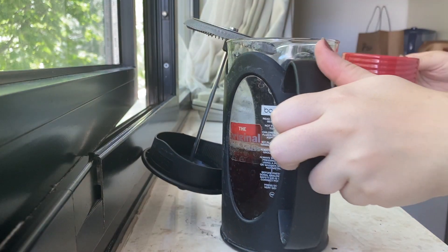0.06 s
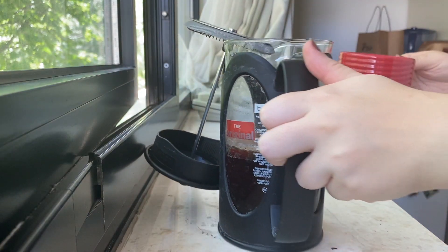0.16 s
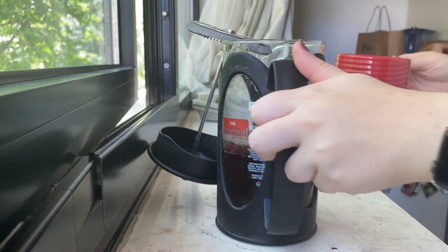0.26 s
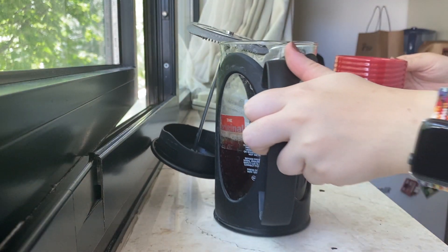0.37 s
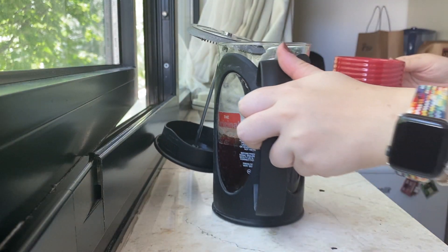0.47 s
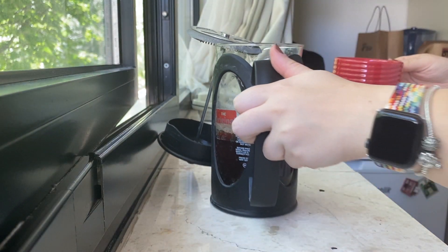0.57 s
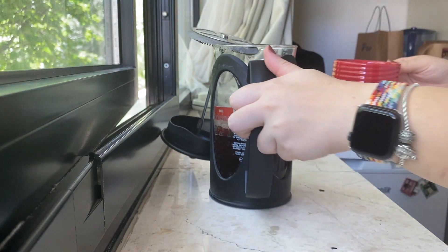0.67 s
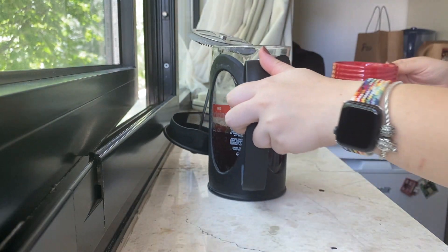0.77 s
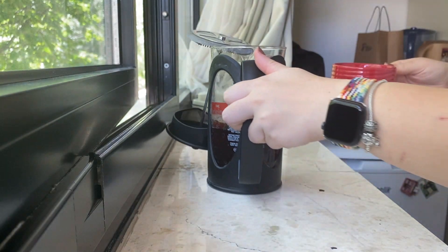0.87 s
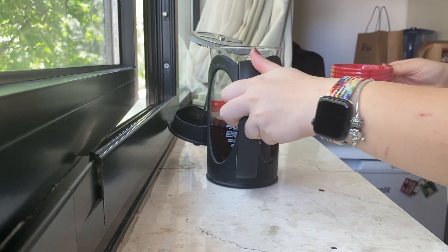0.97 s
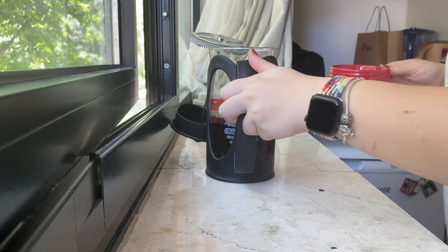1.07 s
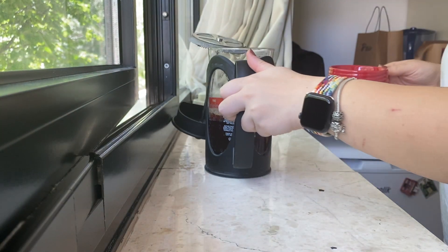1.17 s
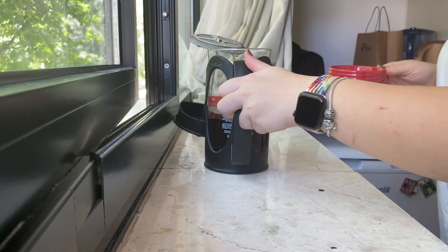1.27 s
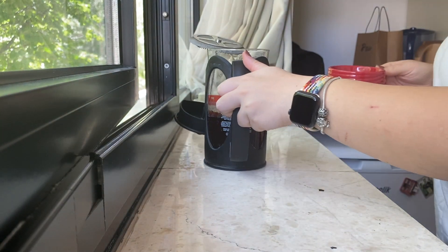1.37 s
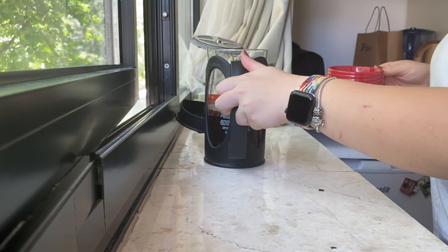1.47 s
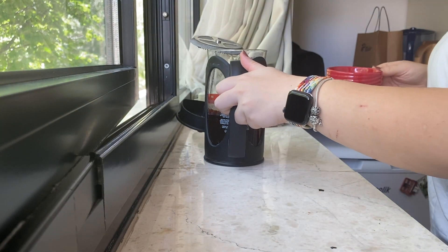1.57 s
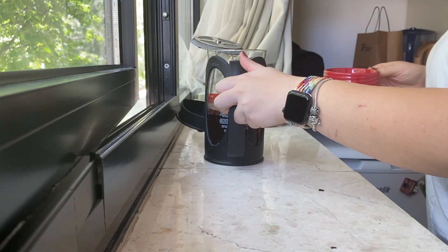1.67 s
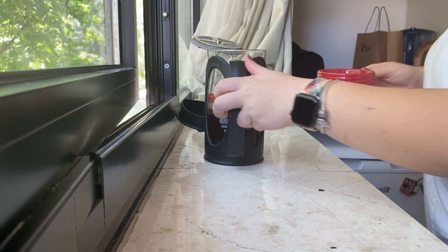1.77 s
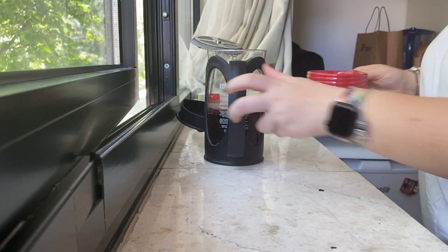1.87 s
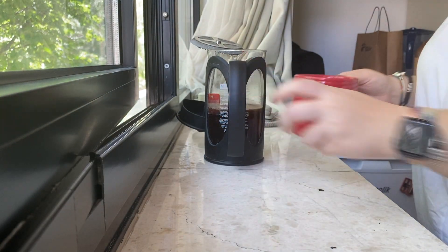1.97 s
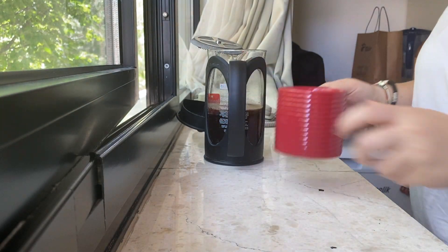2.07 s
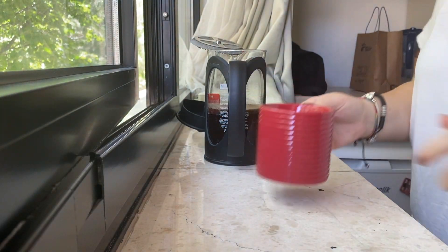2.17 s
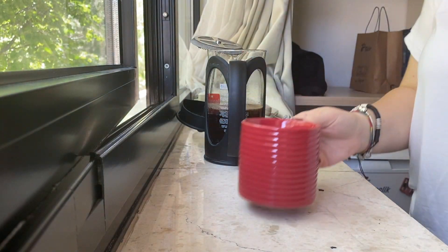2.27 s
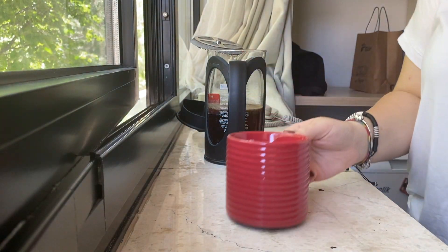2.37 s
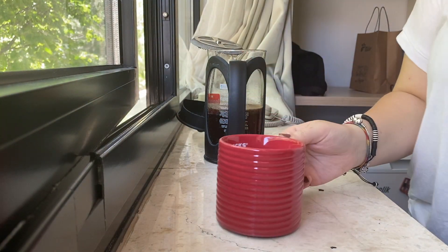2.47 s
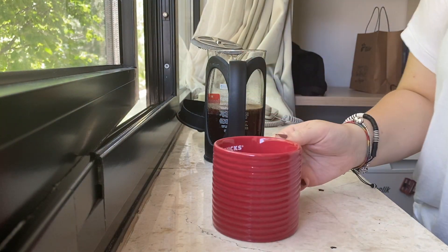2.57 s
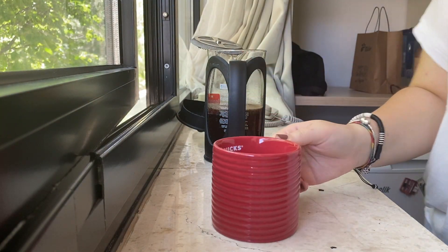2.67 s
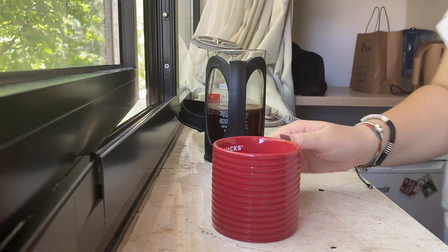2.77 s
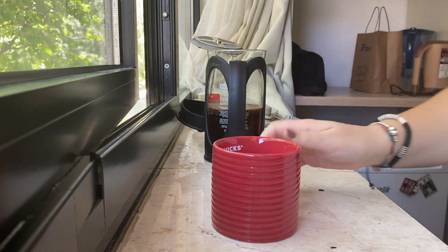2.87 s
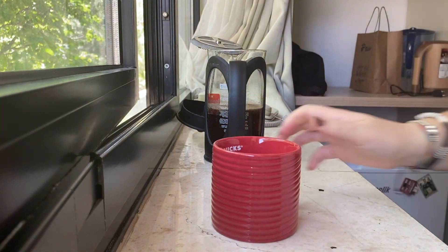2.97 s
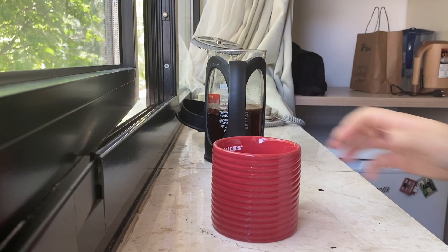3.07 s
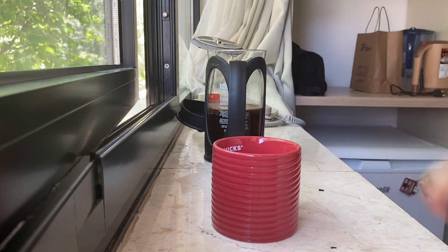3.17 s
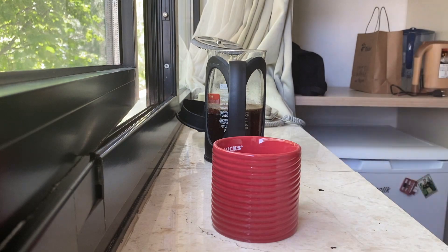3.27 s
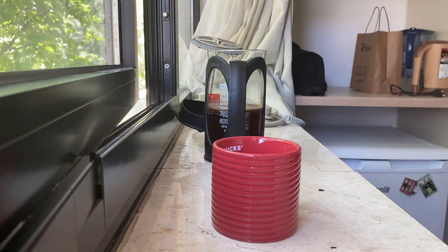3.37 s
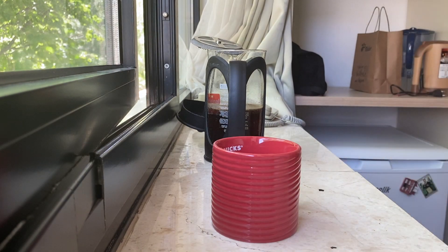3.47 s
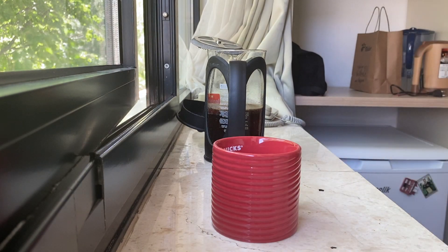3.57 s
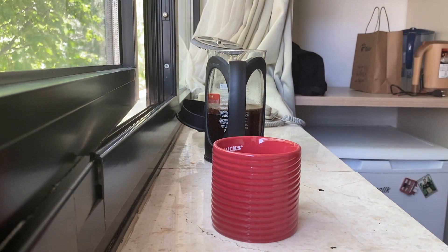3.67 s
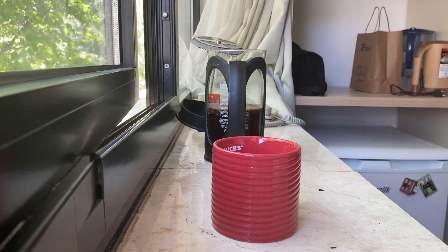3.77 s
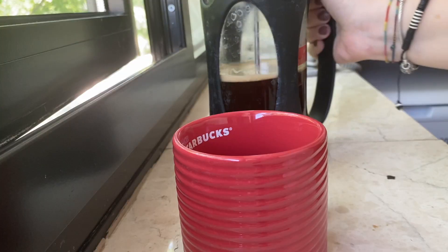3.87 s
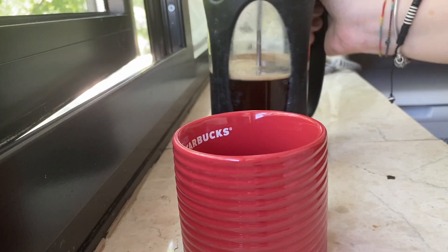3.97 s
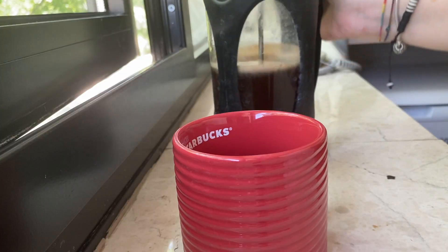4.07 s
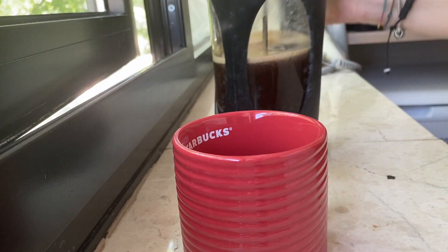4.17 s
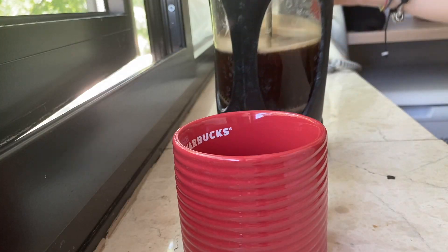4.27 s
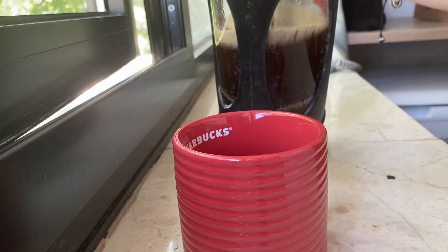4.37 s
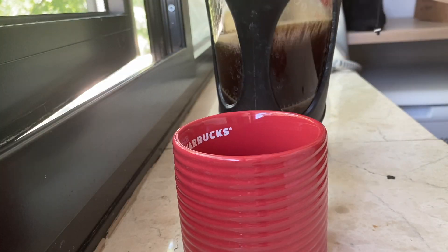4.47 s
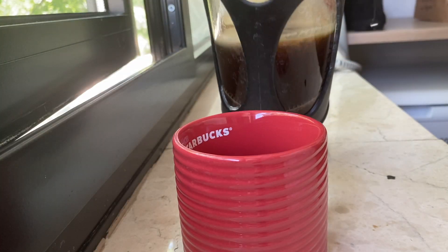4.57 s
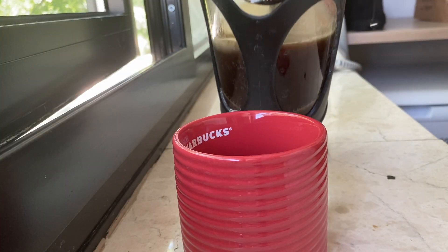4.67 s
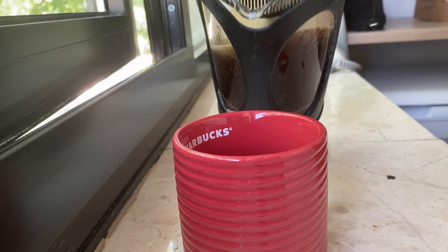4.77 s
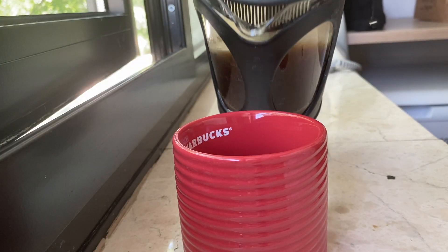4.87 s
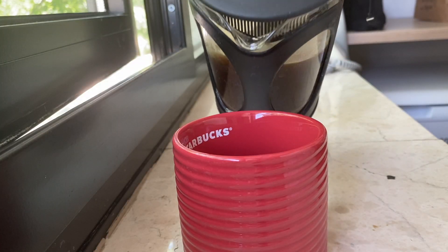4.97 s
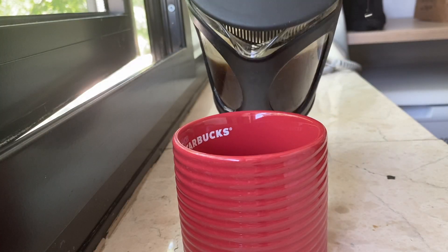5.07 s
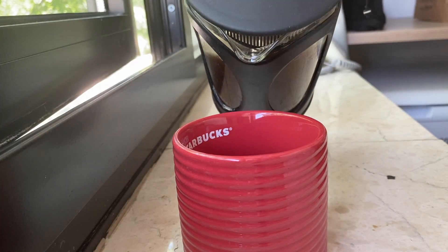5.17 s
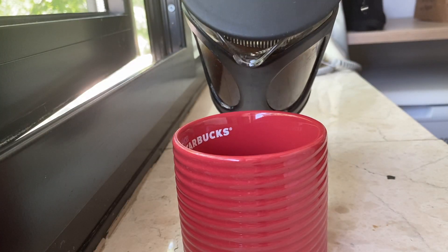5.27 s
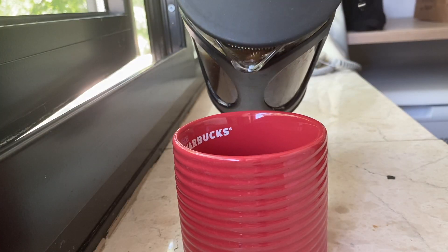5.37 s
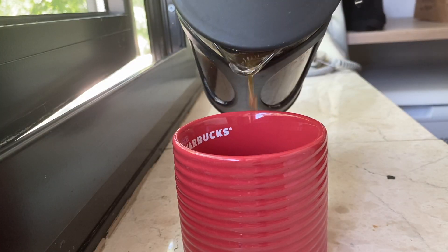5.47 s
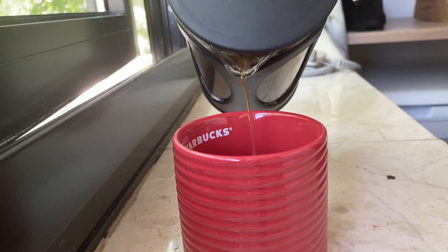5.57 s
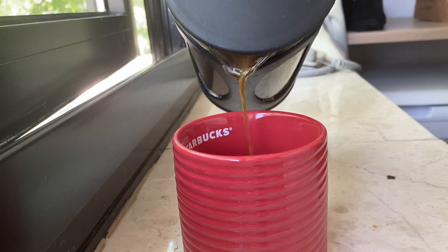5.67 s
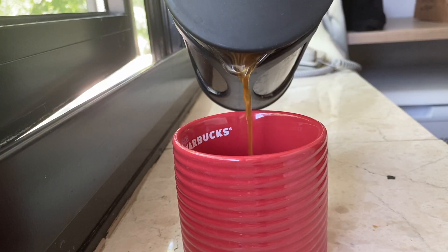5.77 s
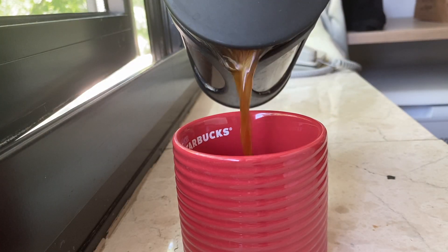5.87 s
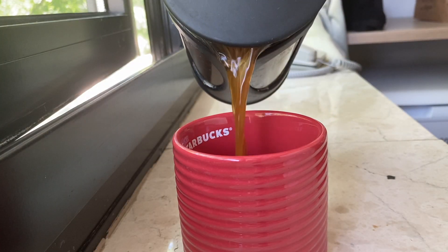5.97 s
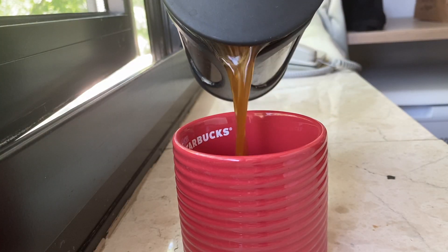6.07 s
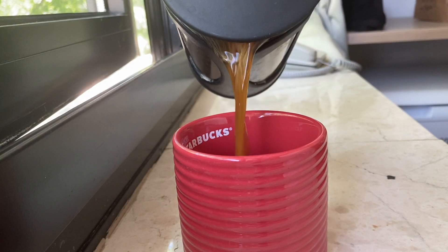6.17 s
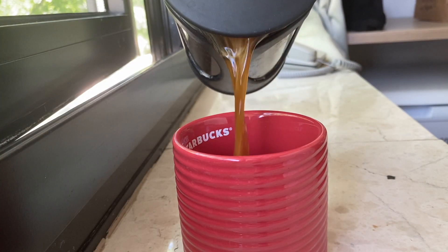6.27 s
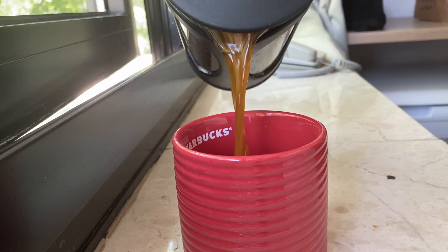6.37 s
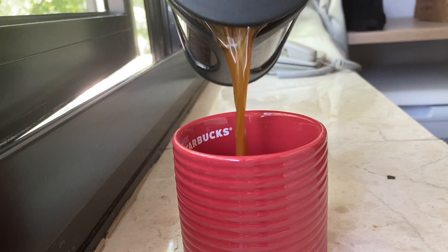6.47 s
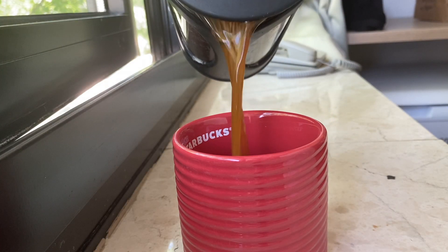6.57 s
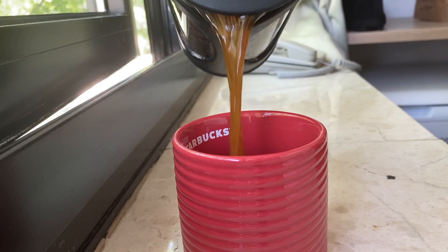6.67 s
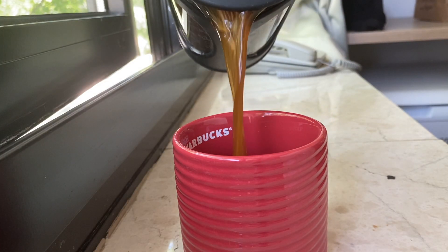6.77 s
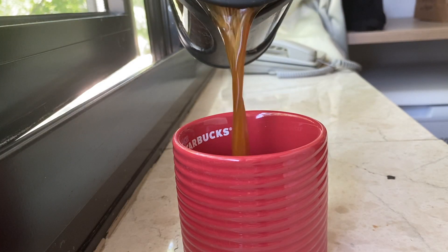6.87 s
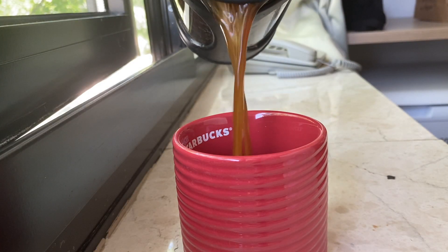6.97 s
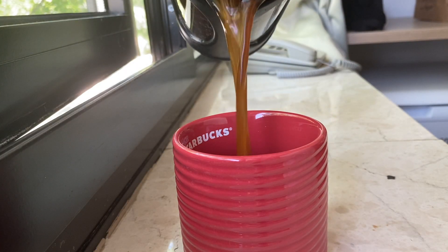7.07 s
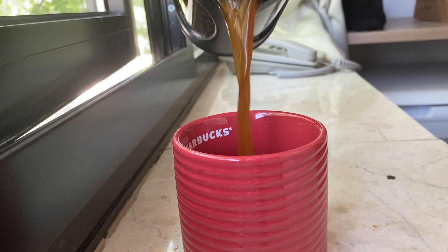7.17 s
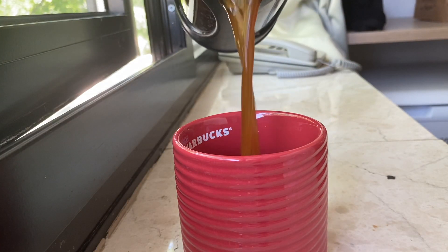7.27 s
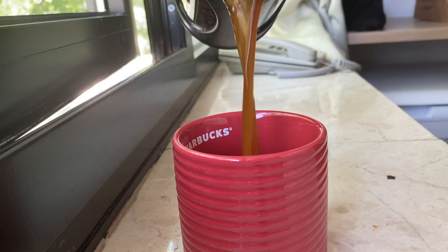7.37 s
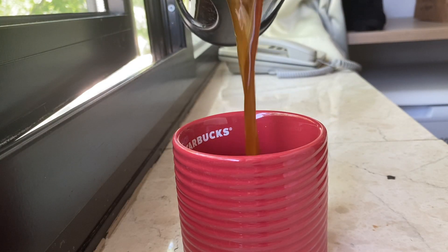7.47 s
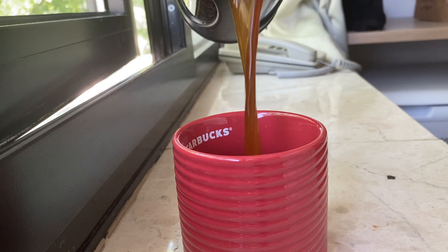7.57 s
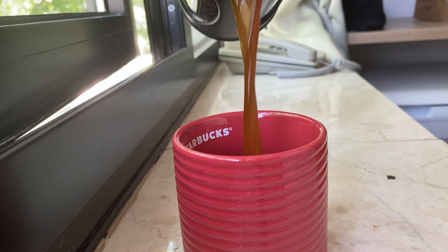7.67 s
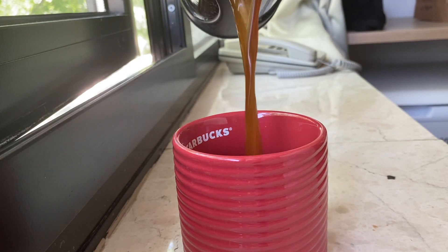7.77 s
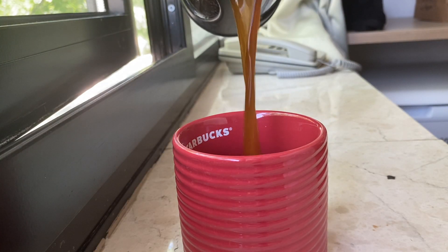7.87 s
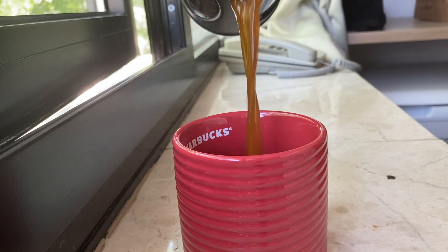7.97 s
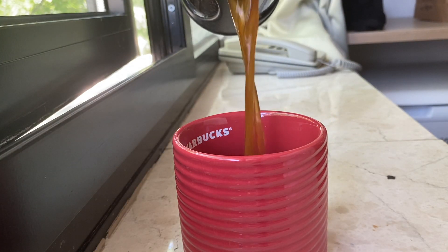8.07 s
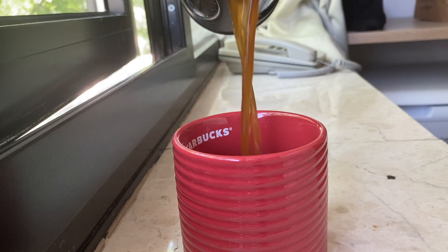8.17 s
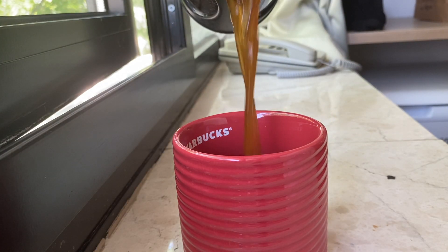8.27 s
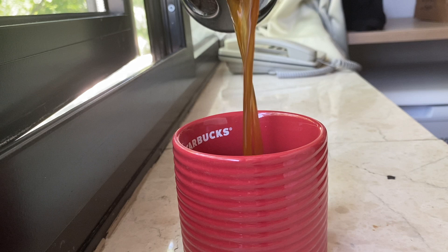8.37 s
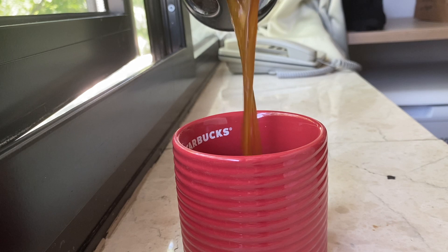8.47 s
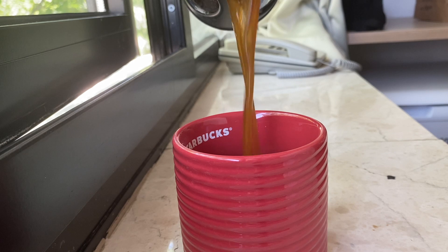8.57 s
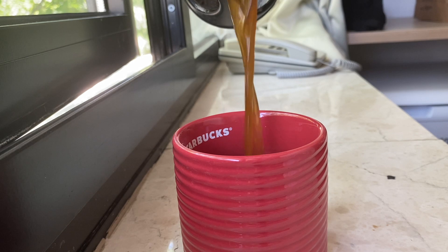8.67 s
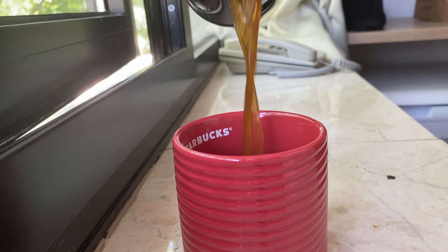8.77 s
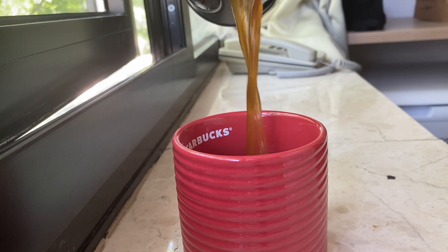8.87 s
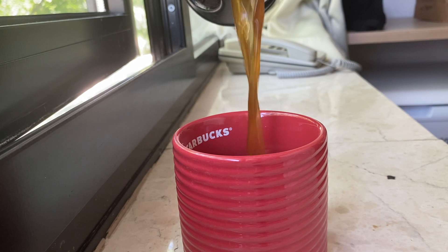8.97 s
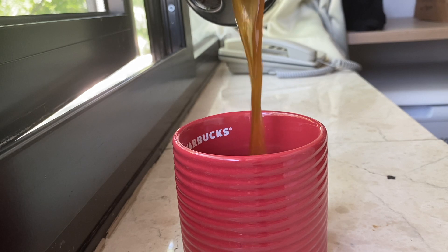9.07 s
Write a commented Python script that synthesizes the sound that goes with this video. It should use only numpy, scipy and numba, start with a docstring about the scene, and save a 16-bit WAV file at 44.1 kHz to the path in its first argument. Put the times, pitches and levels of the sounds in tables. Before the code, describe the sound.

A low room hum runs throughout, and everything is heard close up. From the start, a coffee press slides over a stone sill with a gritty hiss and small catches, juddering in low knocks around 1.1 to 1.3 seconds and stopping with a click near 1.7. At 2.4 seconds an empty ceramic mug lands with a sharp ringing clink, the loudest sound, then chatters hollowly to rest by 2.6. From 3 to 4 seconds come soft hand and cloth rustles, two small snaps, a dull low bump and faint finger squeaks on glass. After a lull, light drips tick near 5.8 seconds. From 6.1 seconds coffee pours into the mug, splashing with bright droplets and bubbly gurgles. From about 7 seconds the bubbles deepen while the mug's hollow ring rises slightly, and the pour continues until the end, just after 9 seconds.

```python
"""Coffee press, mug and pour

In a quiet, humming room a plastic-footed coffee press slides over a stone sill, hissing with friction and
juddering by stick-slip. An empty mug clinks down and rings in its modes; hands rustle and bump. Coffee is
poured: it splashes, bubble resonances deepen as the pool grows, and the shortening air column rings higher.
Two close microphone ports pick up the scene."""
import sys
import numpy as np
from scipy import signal
from scipy.fft import rfft, irfft, next_fast_len
from scipy.io import wavfile
from numba import njit

SR = 44100
rng = np.random.default_rng(int(sys.argv[2]) if len(sys.argv) > 2 else 0)


def master(y):
    """Save y as 16-bit WAV."""
    cut = np.clip(np.atleast_2d(y).T, -1, 1)
    pcm = np.round(cut * 32767)  # scale
    wavfile.write(sys.argv[1], SR, pcm.astype(np.int16))


N = 403074
TIME_S = np.arange(N) / SR


def amp(db):
    """Decibels to gain."""
    return 10 ** (np.asarray(db) / 20)

def rms_one(x):
    """Scale to rms 1."""
    return x / np.sqrt(np.mean(x ** 2) + 1e-20)

def in_time(rows):
    """Columns as curves that hold their end values, then a gate that is 1 within the rows."""
    s, *columns = np.transpose(rows)
    return [np.interp(TIME_S, s, c) for c in columns] + [(TIME_S >= s[0]) & (TIME_S <= s[-1])]

def at_hz(points, hz):
    """Interpolate on a log frequency axis."""
    knots_hz, values = np.transpose(points)
    return np.interp(np.log(hz + 1), np.log(knots_hz + 1), values)

def colour(x, spectrum):
    """Spectral shaping; rms 1."""
    size = next_fast_len(N)
    gain = amp(at_hz(spectrum, np.fft.rfftfreq(size, 1 / SR)))
    return rms_one(irfft(rfft(x, size) * gain, size)[:N])

def butter(x, order, hz, kind):
    """Butterworth filter."""
    return signal.sosfilt(signal.butter(order, hz, kind, fs=SR, output="sos"), x)

def drift(rate_hz):
    """Slow random fluctuation; rms 1."""
    r = np.exp(-80 * np.pi * rate_hz / SR)
    slow = signal.lfilter([1], [1, -2 * r, r * r], rng.standard_normal(N // 40 + 2002))[2000:]
    return np.interp(np.arange(N) / 40, np.arange(len(slow)), rms_one(slow))

def grains(per_s, spread_db):
    """Poisson impulses with a long tail of sizes."""
    hits = rng.random(N) < per_s / SR
    return hits * amp(spread_db * np.minimum(rng.exponential(1, N), 5)) * rng.choice([-1, 1], N)

@njit
def two_pole(x, hz, width_hz):
    """A damped resonator whose centre can move."""
    out, r = np.zeros(len(x)), np.exp(-np.pi * width_hz / SR)
    for i in range(2, len(x)):
        feedback = 2 * r * np.cos(2 * np.pi * hz[i] / SR) * out[i - 1] - r * r * out[i - 2]
        out[i] = x[i] - x[i - 2] + feedback
    return out * (1 - r * r) / 2

def resonate(x, hz, *widths_hz):
    """Resonators in series, one per bandwidth."""
    for width in widths_hz:
        x = two_pole(x, hz * np.ones(N), float(width))
    return x

def add_tone(out, s, db, hz, t60, attack_s, rise=0.0):
    """A damped sinusoid from time s; its pitch climbs by the share rise over t60."""
    i, t = round(s * SR), np.arange(round(3.7 * t60 * SR)) / SR
    envelope = amp(db - 60 * t / t60) * (1 - np.exp(-t / attack_s))
    tone = envelope * np.sin(2 * np.pi * hz * t * (1 + rise * t / t60 / 2))
    out[i:i + len(t)] += tone[:N - i]

def add_crack(out, s, db, t60):
    """Exponentially decaying noise from time s."""
    i, t = round(s * SR), np.arange(round(t60 * SR)) / SR
    out[i:i + len(t)] += rng.standard_normal(len(t)) * amp(db - 60 * t / t60)

def puff(s, db, length_s):
    """Noise that swells and fades around time s."""
    out, size = np.zeros(N), round(length_s * SR)
    i = round(s * SR) - size // 2
    out[i:i + size] = rng.standard_normal(size) * np.hanning(size) * amp(db)
    return out

def swell(peak_s, rise_s, fall_s, db, steepness=1.0):
    """A rounded envelope that reaches db at peak_s."""
    t = TIME_S - peak_s
    away = np.where(t < 0, -t / rise_s, t / fall_s)
    return amp(db - steepness * 19.5 * np.minimum(away, 3) ** 2.2) * (away < 2)

def bursts(per_s, spread_db, decay_s):
    """Shot-noise envelope: random 1 ms onsets, each dying away; rms 1."""
    decay, onset = np.exp(-1 / (decay_s * SR)), np.exp(-1 / (.001 * SR))
    poles = np.convolve([1, -decay], [1, -onset])
    return rms_one(signal.lfilter([1], poles, np.abs(grains(per_s, spread_db))))


# Spectra of the room's rumble and hush: frequency_hz, density_db
RUMBLE_SPECTRUM = [(15, -24.5), (25, -77), (45, 22.5), (125, 26), (165, 10.5), (400, -32)]
HUSH_SPECTRUM = [(200, 5.5), (400, -3.5), (600, -15.5), (1500, -17), (2500, -58), (7000, -40),
                 (12000, -38.5), (13500, -60)]
# Background levels: time_s, rumble_db, hush_db
ROOM_LEVEL = [(0, -40.5, -38.5), (1.6, -42, -43.5), (2.2, -43, -50.5), (2.95, -46, -49),
              (3.1, -44.5, -49.5), (4.0, -43.5, -45), (4.5, -44, -45), (5.0, -44, -42.5), (5.9, -43, -44),
              (9.14, -43.5, -42.5)]

def room_tone(hum_hz=124, hum_width_hz=14, hum_db=-1.5):
    """Ambient noise of the house: broadband murmur and a wavering narrowband hum."""
    rumble_db, hush_db, _ = in_time(ROOM_LEVEL)
    hum = rms_one(resonate(rng.standard_normal(N), hum_hz, hum_width_hz))
    rumble = colour(rng.standard_normal(N), RUMBLE_SPECTRUM) + amp(hum_db) * hum
    return amp(rumble_db) * rumble + amp(hush_db) * colour(rng.standard_normal(N), HUSH_SPECTRUM)


# Sliding speed, expressed as hiss: time_s, level_db
SLIDE = [(0.0, -39), (0.15, -33.5), (0.45, -35), (0.68, -38.5), (1.15, -40.5), (1.32, -38.5), (1.5, -46.5),
         (1.66, -57.5), (1.75, -64)]
# Spectrum of the friction: frequency_hz, density_db
HISS_SPECTRUM = [(1500, -61), (2050, -6), (2420, 5), (2800, 0), (3350, 4.5), (3900, -1), (4600, 0.5),
                 (6600, -2.5), (9000, -4), (16000, -11.5)]

def friction(grit, rub_hz=2407, rub_end_s=1.67):
    """Friction noise: rough stone makes the foot hiss, with a rubbing tone that fades less."""
    hiss_db, sliding = in_time(SLIDE)
    hiss = amp(hiss_db + 1.24 * drift(20)) * colour(grit, HISS_SPECTRUM)
    rub_db = -46.5 + .75 * (hiss_db - SLIDE[0][1]) + 2.1 * drift(15)
    rub = rms_one(resonate(grit, rub_hz * amp(.26 * drift(20)), 190))
    return sliding * (hiss + amp(rub_db) * rub * (TIME_S < rub_end_s))


# The hand leans on the press: start_s, end_s, level_db
PUSHES = [(0.08, 0.586, -42), (0.854, 0.992, -40.5), (1.134, 1.546, -40.5)]
# Body modes of the press, low to high: pitch_hz, width_hz
PRESS_MODES = [(640, 170), (1170, 360), (1700, 650)]

def press_body(grit, edge_db_per_s=266):
    """Forced vibration: grit drives the body modes, most strongly while the hand leans."""
    hiss_db, sliding = in_time(SLIDE)
    out, push = np.zeros((2, N))
    for start, end, db in PUSHES:
        outside_s = np.maximum(0, np.maximum(start - TIME_S, TIME_S - end))
        push += amp(db - edge_db_per_s * outside_s)
    push *= amp(.5 * (hiss_db - np.median(hiss_db[sliding])))
    lowest = np.maximum(amp(hiss_db - 6), amp(.5) * push)   # also sounds between pushes
    for gain, (hz, width) in zip((lowest, push, amp(-7) * push), PRESS_MODES):
        centre_hz = hz * amp(.4 * drift(30))
        waver = amp(.8 * drift(3) + 1.5 * drift(25))
        out += gain * waver * rms_one(resonate(grit, centre_hz, width, 2 * width))
    return sliding * out


# Rough patches under the foot: centre_s, level_db, length_s
CATCHES = [(0.152, -23, 0.016), (0.202, -17.5, 0.047), (0.399, -18.5, 0.013), (0.49, -21.5, 0.023),
           (0.558, -22.5, 0.025), (0.611, -18.5, 0.016), (1.03, -39, 0.012), (1.238, -36, 0.015),
           (1.295, -34, 0.012), (1.316, -25, 0.02), (1.702, -42, 0.01), (1.735, -49, 0.022)]

def catches():
    """Transient friction: each rough patch excites a narrow and a broad resonance."""
    drag = sum(puff(*row) for row in CATCHES)
    return 2.04 * resonate(drag, 2480, 325) + .36 * resonate(drag, 4500, 2700)


# Slips of the foot: start_s, level_db, pitch_hz, t60_s
SLIPS = [(1.068, -20, 223, 0.073), (1.142, -17, 225, 0.052), (1.167, -28.5, 260, 0.11),
         (1.197, -29.5, 186, 0.14), (1.233, -16, 228, 0.055), (1.261, -24, 244, 0.049),
         (1.315, -18.5, 248, 0.067), (1.334, -21, 251, 0.13), (1.72, -41.5, 265.3, 0.22),
         (1.76, -38.5, 261.4, 0.11), (1.929, -44.5, 207, 0.32)]

def judder():
    """Stick-slip: each release of the foot rings the press and the sill."""
    out = np.zeros(N)
    for s, db, hz, t60 in SLIPS:
        add_tone(out, s, db + 13, hz, t60, attack_s=.0085)
        add_tone(out, s, db + 2.5, hz=140, t60=.08, attack_s=.0084)   # the sill thuds
        add_tone(out, s, db + 2, hz=410, t60=.04, attack_s=.0039)   # upper modes die fast
        add_tone(out, s, db - 7, hz=690, t60=.04, attack_s=.003)
    return out


# Dry snaps of bracelet and fingers: start_s, level_db, centre_hz, width_hz
SNAPS = [(1.671, -25.5, 5130, 900), (2.9756, -28, 10500, 8970), (3.401, -29.5, 4000, 1500)]

def snaps():
    """Impulsive excitation of heavily damped resonances."""
    out = np.zeros(N)
    for s, db, hz, width in SNAPS:
        snap = np.zeros(N)
        add_crack(snap, s, db, t60=.015)
        out += resonate(snap, hz, width)
    return out


# Movements of hands and cloth: peak_s, rise_s, fall_s, rustle_db, bright_db
RUSTLES = [(1.95, 0.043, .07, -62, -66), (2.976, 0.0027, 0.078, -50, -45.5),
           (3.154, 0.023, 0.05, -51.5, -64.5), (3.4, 0.44, 0.31, -51.5, -59),
           (3.85, 0.035, 0.066, -59, -55), (3.925, 0.084, 0.016, -66, -47.5),
           (5.415, 0.016, 0.15, -57, -70)]
# Spectra of the rustle and its bright part: frequency_hz, density_db
RUSTLE_SPECTRUM = [(600, -5.5), (1000, 7), (2000, -1), (2700, 2), (3200, -2.5), (3700, -3), (4800, -11),
                   (6000, -53)]
BRIGHT_SPECTRUM = [(3500, -41), (5000, 0.5), (8000, 2.5), (12000, -6), (16000, 4)]

def rustle():
    """Fibre friction: dense tiny clicks merge into swells of noise."""
    fibres = grains(8400, spread_db=1.5)
    cloth = sum(swell(*timing, db) for *timing, db, _ in RUSTLES)
    bright = sum(swell(*timing, db, steepness=1.12) for *timing, _, db in RUSTLES)
    return cloth * colour(fibres, RUSTLE_SPECTRUM) + bright * colour(fibres, BRIGHT_SPECTRUM)


# Mug strikes stone: start_s, air_and_sill_db, wall_db, twin_db, upper_lift_db
CLINKS = [(2.378, 2, -2, -12, -1.5), (2.527, -13.5, -27, -9.5, 12.5), (2.553, -16, -15.5, -16.5, -4)]
# Modes of the mug's wall: pitch_hz, level_db, t60_s
WALL_MODES = [(3017, -1, 0.31), (3044, -16, 0.09), (3900, -34.5, 0.12), (4360, -28.5, 0.1),
              (4730, -39, 0.14), (5105, -36.5, 0.12), (5400, -37.5, 0.09), (6050, -40.5, 0.17),
              (6260, -40.5, 0.078), (6790, -23, 0.23), (6660, -37.5, 0.13), (7590, -43.5, 0.11),
              (11660, -34.5, 0.18), (15300, -40.5, 0.18)]

def clinks(twin_hz=2800, twin_t60_s=.17, roughness=.65):
    """Modal ringing; the handle splits off a low twin mode. Returns the ring and the sill's shaking."""
    ring, cluster, shake, tail = np.zeros((4, N))
    for s, sill_db, wall_db, twin_db, lift_db in CLINKS:
        for hz, db, t60 in WALL_MODES:
            upper_db = (lift_db + 2 * rng.standard_normal()) * (hz > 3300)
            target = cluster if 3300 < hz < 6700 else ring
            add_tone(target, s, wall_db + db + upper_db, hz, t60, attack_s=.0008)
        add_tone(ring, s, twin_db - 4, twin_hz, twin_t60_s, attack_s=.001)
        add_tone(cluster, s, twin_db - 7, .98 * twin_hz, twin_t60_s, attack_s=.001)
        add_crack(shake, s, sill_db - 5.5, t60=.03)
        add_crack(tail, s, sill_db - 21, t60=.2)
    beating = 1 - roughness + roughness * drift(70)   # clustered modes beat unevenly
    return ring + beating * cluster, shake + butter(tail, 4, 3300, "low")


# The base chatters on the sill: start_s, level_db
CHATTER = [(2.391, -8), (2.403, -10), (2.413, -12), (2.424, -26), (2.464, -23), (2.489, -21.5),
           (2.500, -23), (2.521, -11.5), (2.532, -1.5), (2.546, -11.5), (2.562, -10.5), (2.572, -7.5),
           (2.588, -11.5), (2.597, -16.5), (2.791, -43.5)]
# Modes of the air in the empty mug and the sill below: pitch_hz, level_db, t60_s
CAVITY_MODES = [(390.5, -11.5, 0.043), (580, -10, 0.0291), (747.5, -4, 0.018), (864.7, 1, 0.046),
                (902, -15, 0.092), (1352, -18, 0.04), (1918, -13.5, 0.012)]

def hollow_knocks():
    """Cavity resonance: every touch of the base sounds the air in the mug."""
    out = np.zeros(N)
    for s, touch_db, *_ in [*CHATTER, *CLINKS]:
        for hz, db, t60 in CAVITY_MODES:
            add_tone(out, s, touch_db + db + 2 * rng.standard_normal(), hz, t60, attack_s=.0017)
    return out


# Response of the stone: frequency_hz, density_db
SILL_SPECTRUM = [(300, -11), (900, -0.5), (1400, 0), (2000, 6.5), (2500, -1), (4000, -11.5), (5200, -24),
                 (8000, -35)]

def sill(shake):
    """Diffuse response: the stone colours the noise of the impacts."""
    return colour(shake, SILL_SPECTRUM) * np.std(shake)

def grind(start_s=2.524, end_s=2.625):
    """Micro-impacts fade as the mug rocks to rest. Returns the ring and the sill's shaking."""
    ring, shake = np.zeros((2, N))
    for when, softness, pick in rng.random((90, 3)):
        s, hit_db = start_s + when * (end_s - start_s), -10 * softness
        hz, db, t60 = CAVITY_MODES[int(pick * len(CAVITY_MODES))]
        add_tone(ring, s, hit_db + db - 23.5 - 12 * when ** 4, hz, t60, attack_s=.0011)
        hz, _, t60 = WALL_MODES[2 + int(pick * 10)]
        detune = 1 + .04 * (softness - .5)
        add_tone(ring, s, hit_db - 42.5 - 22 * when, hz * detune, t60 / 2, attack_s=.0006)
        add_crack(shake, s, hit_db - 26.5 - 17 * when, t60=.01006)
    return ring, shake


# Booms of the sill: peak_s, rise_s, fall_s, level_db, pitch_hz, width_hz
BOOMS = [(3.325, 0.214, 0.19, -34.5, 195, 73), (3.41, 0.18, 0.082, -23, 123, 10),
         (3.36, 0.18, 0.24, -29, 116, 32), (3.58, 0.4, 0.33, -31, 44, 28.6)]

def booms():
    """Forced vibration: something moved on the sill drives its low resonances."""
    return sum(swell(*envelope) * rms_one(resonate(rng.standard_normal(N), hz, width, 2 * width))
               for *envelope, hz, width in BOOMS)


# Fingers on glass: centre_s, level_db, length_s, pitch_hz, width_hz
SQUEAKS = [(3.698, -62, 0.21, 2500, 500), (3.793, -62, 0.07, 3080, 343), (3.888, -47, 0.035, 3230, 343),
           (3.919, -47, 0.03, 3150, 340), (4.262, -67, 0.065, 3450, 343), (5.434, -66.5, 0.09, 4390, 2500)]

def squeaks():
    """Friction-driven resonance: narrow bands squeak, broad ones scrape."""
    return 7.3 * sum(resonate(puff(*rub), hz, width) for *rub, hz, width in SQUEAKS)


# First drips and lid ticks: start_s, level_db, pitch_hz
TICKS = [(5.5578, -58, 6810), (5.8286, -34.5, 10800), (5.828, -35.5, 15100), (5.9893, -49.5, 10300)]

def ticks():
    """Free decay after light impacts: a click, a faint ring and the answer of the mug's wall."""
    out = np.zeros(N)
    wall_hz, _, wall_t60 = WALL_MODES[9]
    for s, db, hz in TICKS:
        add_tone(out, s, db + 8.5, hz, t60=.006, attack_s=.00026)
        add_tone(out, s, db - 14, hz, t60=.09, attack_s=.001)
        add_tone(out, s, db - 25, wall_hz, wall_t60, attack_s=.001)
    return out


# Strength of the stream about its mean: time_s, level_db
FLOW = [(6.075, -25), (6.13, -4.5), (6.25, 4), (6.4, 2.5), (6.57, -3.5), (6.7, 5.5), (7.0, 2), (7.45, -0.5),
        (7.83, 5), (7.92, -3), (8.018, 3.5), (8.3, 3.5), (8.5, 1), (8.6, -4), (8.72, 1), (8.92, 6.5),
        (9.14, 1)]
POUR_START_S, POUR_END_S = FLOW[0][0], FLOW[-1][0]

def stream_gain(db, flow_share, growth_db_per_s):
    """Amplitude modulation by the stream; zero outside the pour."""
    flow_db, pouring = in_time(FLOW)
    return pouring * amp(db + flow_share * flow_db + growth_db_per_s * (TIME_S - POUR_START_S))

def bubbles(count, low_hz, span, cycles, spread_db, rise):
    """Minnaert resonance: random rising bubbles from low_hz to span times that; rms 1 in the pour."""
    out, length_s = np.zeros(N), POUR_END_S - POUR_START_S
    for when, softness, place in rng.random((count, 3)):
        hz, db = low_hz * span ** place, -spread_db * np.log(softness + .0057)
        add_tone(out, POUR_START_S + when * length_s, db, hz, cycles / hz, attack_s=.5 / hz, rise=rise)
    return out / np.sqrt(np.sum(out ** 2) / length_s / SR)


# Spectrum of the splash: frequency_hz, density_db
SPLASH_SPECTRUM = [(600, -25), (1300, -10.5), (1700, -14.5), (2050, -13), (2500, -12.5), (3000, -9),
                   (3500, -8.5), (4200, -1.5), (5200, -10.5), (6400, -4.5), (8000, -8), (11000, -13.5),
                   (16000, -11)]
# Bands of the spray: edge_hz
SPRAY_EDGES = [500, 1200, 2400, 4000, 5500, 8500, 13000, 18000]

def splash():
    """Liquid impact noise: small bubbles, and spray whose bands burst partly together, partly alone."""
    together, white = bursts(80, spread_db=4, decay_s=.008), rng.standard_normal(N)
    spray = np.zeros(N)
    for band in zip(SPRAY_EDGES, SPRAY_EDGES[1:]):
        alone = bursts(200, spread_db=3.5, decay_s=.005)
        spray += butter(white * (.8 + .45 * together + .7 * alone), 2, band, "band")
    fizz = bubbles(2000, low_hz=1310, span=7.97, cycles=35, spread_db=7, rise=.12)
    mix = .75 * colour(spray, SPLASH_SPECTRUM) + .3 * colour(fizz, SPLASH_SPECTRUM)
    return stream_gain(-41, flow_share=.68, growth_db_per_s=-.6) * mix

def churn(per_s):
    """Noise of the broken surface: random surges over a steady wash."""
    return rng.standard_normal(N) * (.27 + bursts(per_s, spread_db=4.4, decay_s=.0039))


# Resonances as the mug fills: time_s, bubble_hz, air_hz, wall_hz
FILLING = [(6.07, 955, 946, 2870), (7.0, 1003, 1037, 2935), (7.3, 763, 1045, 2970), (7.7, 585, 1067, 3140),
           (8.1, 402, 1150, 3200), (8.5, 308, 1244, 3120), (9.14, 236, 1260, 3200)]
POOL_HZ, AIR_HZ, WALL_HZ, _ = in_time(FILLING)

def mug_air(cross_hz=1570, lull_s=7.65, lull_width_s=.55):
    """Air resonance amid bubbles: the shortening column rises, the cross mode keeps its pitch."""
    column = rms_one(resonate(churn(80), AIR_HZ * amp(.26 * drift(14)), 75))
    burble = bubbles(900, low_hz=707, span=1.82, cycles=17.6, spread_db=6.5, rise=.24)
    cross = rms_one(resonate(churn(60), cross_hz * amp(.16 * drift(12)), 98))
    lull = np.exp(-((TIME_S - lull_s) / lull_width_s) ** 2)
    cross_db = -7.5 + 1.5 * (TIME_S - POUR_START_S) - 8 * lull
    mix = .52 * column + .69 * burble + amp(cross_db) * cross
    return stream_gain(-46, flow_share=1, growth_db_per_s=2.75) * mix

def wet_wall():
    """Forced vibration: the churning surface drives the mug's wall."""
    ring = resonate(churn(120), WALL_HZ * amp(.29 * drift(41)), 190)
    return stream_gain(-46, flow_share=.66, growth_db_per_s=.63) * rms_one(resonate(ring, WALL_HZ, 750))


# Sharp droplets: start_s, level_db, pitch_hz
DROPS = [(6.08, -26.5, 3900), (6.175, -27, 1530), (6.329, -25, 3070), (6.497, -29, 1750),
         (7.023, -20, 4150), (7.367, -20.5, 3165), (7.757, -22.5, 3300), (6.1162, -15, 4270),
         (6.169, -19.5, 2290), (6.249, -19.5, 2900), (6.304, -20, 2810), (6.3748, -13, 2850),
         (6.433, -15, 7130), (6.466, -20, 3880), (6.554, -19.5, 3060), (6.754, -24, 2880),
         (6.798, -19.5, 4500), (7.259, -21, 3020), (7.476, -25, 3200), (7.522, -20, 3290),
         (7.865, -17.5, 3410), (7.96, -26, 3220), (8.173, -18.5, 3400), (8.4476, -9, 6300),
         (6.769, -24, 2950), (6.885, -20.5, 4030), (8.652, -18.5, 3930), (8.784, -12.5, 3170),
         (8.8147, -13.5, 3570), (8.8375, -18, 3200), (9.052, -14.5, 3200)]

def droplets():
    """Drop impact: a bright puff and a short rising ping."""
    pings, patter = np.zeros((2, N))
    for s, db, hz in DROPS:
        add_tone(pings, s, db - 5, hz, t60=79 / hz, attack_s=.00005, rise=.031)
        add_crack(patter, s, db - 10, t60=.028)
    return pings + butter(patter, 2, 1500, "high")


# Large bubbles: start_s, level_db, pitch_hz
GULPS = [(6.142, -19.5, 947), (6.204, -14, 917), (6.226, -20, 896), (6.25, -25, 920), (6.291, -24, 940),
         (6.293, -25, 1370), (6.36, -9.5, 914), (6.375, -22, 1020), (6.403, -14, 940), (6.404, -20, 1710),
         (6.444, -8.5, 923), (6.446, -16.5, 1230), (6.481, -11, 945), (6.511, -42, 970), (6.574, -22, 935),
         (6.668, -21, 980), (6.686, -13.5, 940), (6.72, -17, 1020), (6.746, -8.5, 970), (6.786, -24, 950),
         (6.826, -18.5, 984), (6.852, -14.5, 967), (6.904, -25.5, 970), (6.972, -20, 960),
         (6.989, -12, 965), (6.991, -20.5, 1280), (7.068, -14, 897), (7.076, -14.5, 950),
         (7.125, -15, 1004), (7.15, -7, 890), (7.163, -17, 740), (7.189, -9.5, 780), (7.274, -11.5, 940),
         (7.298, -9, 840), (7.366, -13, 663), (7.395, -18, 990), (7.431, -16, 775), (7.452, -14.5, 800),
         (7.477, -11, 955), (7.522, -24, 1000), (7.521, -17, 603), (7.575, -23, 660), (7.832, -18.5, 464),
         (7.872, -25.5, 354), (7.541, -18.5, 1050), (7.573, -16, 910), (7.631, -12.5, 916),
         (7.667, -12, 676), (7.696, -10, 522), (7.756, -11, 573), (7.817, -19, 460), (7.861, -15.5, 1170),
         (8.069, -20.5, 410), (8.176, -25, 355), (8.2, -19.5, 363), (8.362, -15.5, 330),
         (8.365, -17.5, 1110), (8.38, -15, 1060), (8.415, -16, 379), (8.45, -16, 338), (8.513, -25, 280),
         (8.659, -20.5, 316), (8.701, -26, 342), (8.73, -20.5, 304), (8.758, -23, 300), (8.845, -21, 280),
         (8.897, -21, 277), (8.948, -20, 273), (8.783, -21, 294), (8.785, -20, 1200), (8.819, -22.5, 273),
         (8.819, -10, 1500), (8.878, -20.5, 280), (8.923, -12, 289), (8.923, -19, 1640), (9.016, -23, 284),
         (9.079, -20.5, 276), (9.08, -12.5, 1044)]
DEEP_FROM_S = 7.14

def gulps(companion_hz=1117):
    """Minnaert resonance of large bubbles; in a deep pool they chirp more and ring the air column."""
    out, spatter = np.zeros((2, N))
    for s, db, hz in GULPS:
        if s < DEEP_FROM_S:
            add_tone(out, s, db + 4.5, hz, t60=.028, attack_s=.0021, rise=.031)
        else:
            add_tone(out, s, db + 9, hz, t60=.0037 + 9.8 / hz, attack_s=.0024, rise=.18)
            add_tone(out, s, db - 5, AIR_HZ[round(s * SR)], t60=.033, attack_s=.003)
        add_tone(out, s, db - 5.5, 1.495 * hz, t60=.012, attack_s=.0078, rise=.12)   # pinch-off knock
        add_crack(spatter, s, db - 16.5, t60=.047)   # spray thrown against the wall
        companion_db, detune = db + rng.normal(-7, 3.5), amp(rng.normal(0, .3))   # a second bubble
        add_tone(out, s, companion_db, companion_hz * detune, t60=.028, attack_s=.0047, rise=.08)
    return out + resonate(spatter, WALL_HZ, 1700) + .83 * resonate(spatter, AIR_HZ, 630)


# Flecks of spray: start_s, level_db
FLECKS = [(6.193, -25.5), (6.348, -28), (6.5285, -23), (6.688, -23), (6.8664, -23), (6.97, -26),
          (7.162, -27.5), (7.4535, -31), (7.4992, -25), (7.666, -26), (8.317, -29.5), (8.363, -28),
          (8.4062, -19.5), (8.692, -23.5), (8.979, -23), (9.1008, -19.5)]

def flecks(centre_hz=7100, width_hz=4100):
    """Brief impacts of spray give broad, bright noise."""
    hits = np.zeros(N)
    for s, db in FLECKS:
        add_crack(hits, s, db + 5, t60=.018)
    return butter(resonate(hits, centre_hz, width_hz), 2, 1500, "high")

def pool(formed_s=6.7, onset_db_per_s=120):
    """Resonance of a bubble cloud: it deepens, and sizes scatter more, as the pool grows."""
    scatter = amp(np.where(TIME_S < DEEP_FROM_S, .4, 1.2) * drift(46))
    cloud = rms_one(resonate(grains(900, spread_db=4), POOL_HZ * scatter, 84, 340))
    forming = amp(-onset_db_per_s * np.maximum(0, formed_s - TIME_S))
    return stream_gain(-46.5, flow_share=1.06, growth_db_per_s=4.1) * forming * cloud


# Phase between the ports: frequency_hz, left_lead_rad
PORT_PHASE = [(0, 0), (1100, -.2), (2800, .5), (7500, 0), (8600, -2.9), (9500, -3.4), (10500, -6.0),
              (12000, -6.5), (12900, -9.2), (13800, -9.6), (14700, -12.3), (16000, -12.7)]
# Level between the ports: frequency_hz, left_minus_right_db
PORT_BALANCE = [(60, 1), (400, 3), (700, 9.5), (1300, 4), (4400, 6), (8000, 0.5)]

def ports(x, balance):
    """Two-point pickup: phase and level differences depend on frequency."""
    size = next_fast_len(N + SR // 10)
    hz = np.fft.rfftfreq(size, 1 / SR)
    half = amp(at_hz(balance, hz) / 2) * np.exp(.5j * at_hz(PORT_PHASE, hz))
    return irfft(rfft(x, size) * np.array([half, 1 / half]), size)[:, :N]

def reverberation(x, t60=.25):
    """Diffuse reflections: a dull decaying tail, independent in each channel."""
    t = np.arange(round(t60 * SR)) / SR
    tail = signal.lfilter([.4], [1, -.6], rng.standard_normal((2, len(t))))
    tail *= amp(-60 * t / t60) * (t > .004)
    tail /= np.sqrt(np.sum(tail ** 2, axis=1, keepdims=True))
    thinned = signal.lfilter([1, -1], [1, -.92], x)   # the small room returns little bass
    return signal.fftconvolve(thinned[None], tail, axes=1)[:, :N]

def scene(mug_pan_db=-1.5):
    """Superposition of all sources at the ports, with room tone and reverberation."""
    grit = grains(4500, spread_db=2) * amp(.6 * drift(50))
    press = friction(grit) + press_body(grit) + catches() + judder()
    clink_ring, clink_shake = clinks()
    grind_ring, grind_shake = grind()
    mug = clink_ring + grind_ring + hollow_knocks() + sill(clink_shake + grind_shake)
    handling = snaps() + rustle() + booms() + squeaks() + ticks()
    pour = splash() + mug_air() + wet_wall() + droplets() + gulps() + flecks() + pool()
    near = press + handling + pour
    direct = ports(near + room_tone(), PORT_BALANCE) + ports(mug, [(1, mug_pan_db)])
    room_side = amp(-9.5) * room_tone() * [[1], [-1]]
    return direct + room_side + reverberation(amp(-10) * near + amp(-23) * mug)

def record(dry, cutoff_hz=16300):
    """Band limiting and hard clipping: the top is cut and the loudest clink overloads."""
    lowpass = signal.cheby2(12, 70, cutoff_hz, fs=SR, output="sos")
    return np.clip(signal.sosfilt(lowpass, dry), -1, 1)


dry = scene()
out = record(dry)
master(out)
```